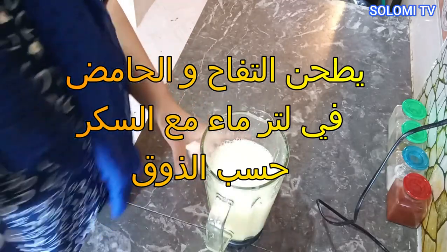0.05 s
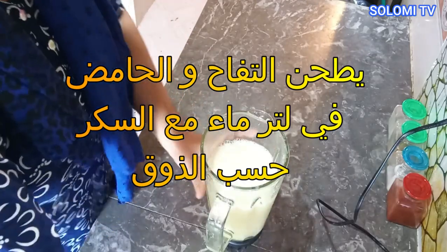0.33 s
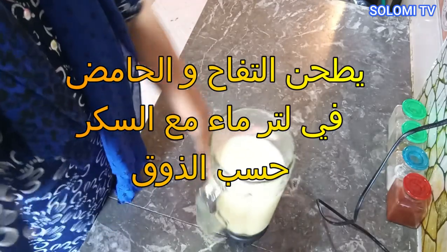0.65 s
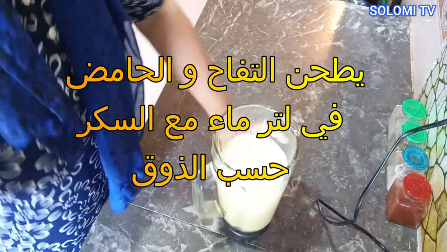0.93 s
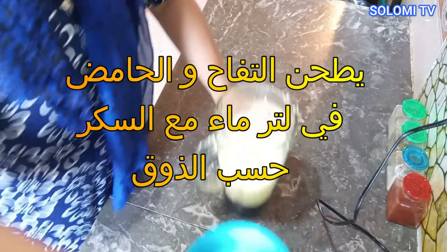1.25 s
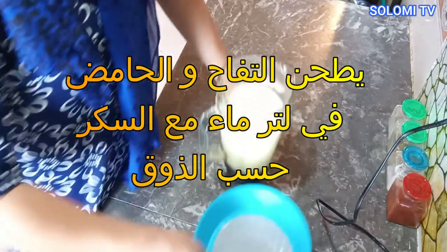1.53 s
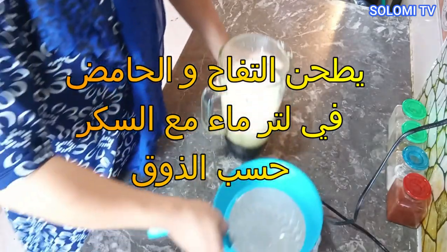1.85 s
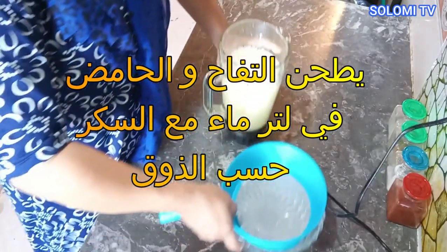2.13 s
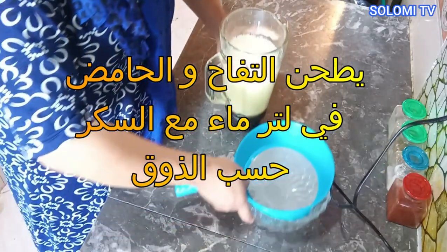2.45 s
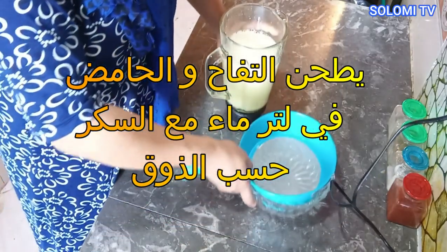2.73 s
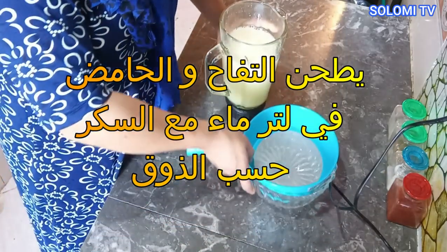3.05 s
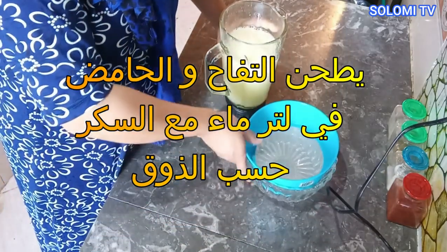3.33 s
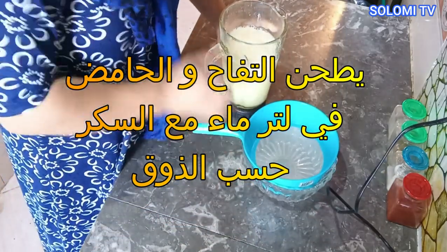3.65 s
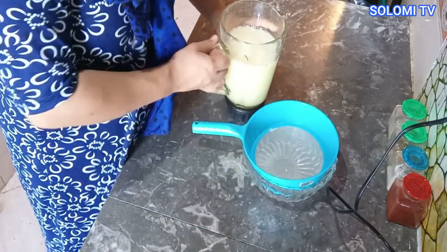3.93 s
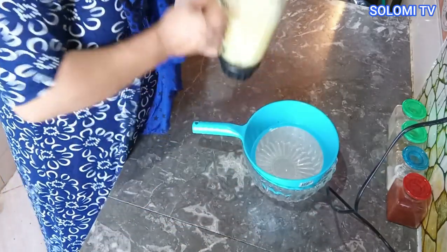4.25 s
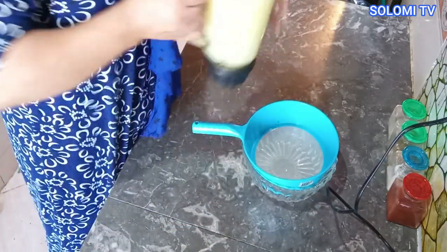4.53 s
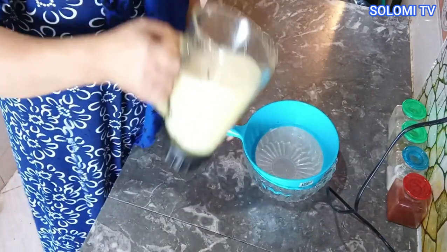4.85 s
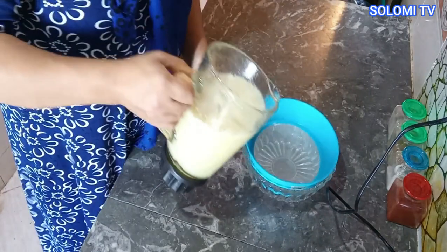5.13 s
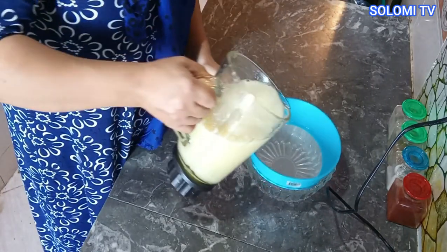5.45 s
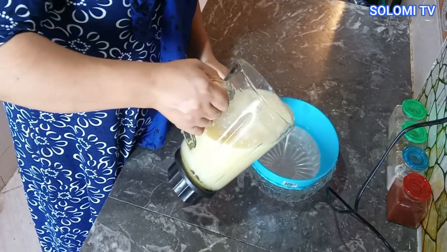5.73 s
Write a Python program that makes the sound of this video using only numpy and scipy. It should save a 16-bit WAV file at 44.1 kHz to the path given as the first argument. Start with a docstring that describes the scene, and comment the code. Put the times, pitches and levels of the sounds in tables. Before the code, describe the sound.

Close kitchen handling: cloth rustles, a glass bowl clatters and slides on stone, and a jug knocks just before juice trickles out.

```python
"""Kitchen handling, close by, over a low hum, a hiss and soft scuffs of feet. A glass bowl with a plastic
strainer in it is dragged off its place (0.5 s) and carried past a rustling dress (1.2 s). It lands
rattling on a stone counter (1.8 s) and is pushed along: its foot sticks and slips, so the stone scrapes,
the glass sings and the strainer clacks (2.8 s). A glass jug knocks on the strainer's rim (5.3 s) and the
first juice slips in with a patter of froth and a few chirping bubbles (5.7 s)."""
import sys
import numpy as np
from scipy import signal
from scipy.fft import rfft, irfft, next_fast_len
from scipy.io import wavfile

SR = 44100
rng = np.random.default_rng(int(sys.argv[2]) if len(sys.argv) > 2 else 0)


def log_audio(samples):
    """Write samples as a 16-bit WAV file to the path given in sys.argv[1]."""
    # one column per channel
    frames = np.atleast_2d(samples).T
    # limit to full scale, then quantise
    limited = np.clip(frames, -1, 1)
    pcm = np.round(limited * 32767).astype(np.int16)
    wavfile.write(sys.argv[1], SR, pcm)


N = 259749
TIME = np.arange(N) / SR

# The kitchen's reverb. Each row: frequency in Hz, t60 (time to fall 60 dB) in seconds.
ROOM_DECAY = [(100, 0.73), (400, 0.48), (900, 0.48), (2500, 0.3), (6000, 0.21), (15000, 0.22)]
# How much more the left microphone hears than the right. Each row: frequency in Hz, lead in dB.
MIC_BALANCE = [(60, 4), (150, 2.5), (320, 1), (460, 6), (720, 0.5), (1100, 8.5), (1400, 8.5), (2400, 7.5),
               (4300, 4), (6400, 6), (7600, 7), (9500, -3.5), (11000, -12), (15000, 2)]
# Room tone. Each row: frequency in Hz, relative level in dB.
AIR_EQ = [(20, -14), (50, -16.5), (110, -4.5), (180, -8), (450, -4.5), (750, -20.5), (1500, -19),
          (3400, -21), (7500, -11), (9300, -28.5), (11000, -18.5), (13500, -27.5), (15000, -24)]
# Peaks in the hiss. Each row: centre in Hz, width in Hz, added level in dB relative to the EQ.
HISS_PEAKS = [(2563, 355, 17.5), (3737, 92, 11), (4577, 484, 13.5), (5350, 290, 2.7), (6430, 510, 9.5),
              (6670, 30, 9.9), (8530, 210, 1), (14670, 2300, 11)]
# Tones of the hum. Each row: frequency in Hz, level in dB before dips and sinking.
HUM_TONES = [(64.6, -58), (49.7, -64), (100, -65.5), (139.3, -67)]
HUM_DIP_TIMES_S = [3.58, 4.5, 5.24, 5.65]

# Feet scuffing as the body turns. Each row: middle in seconds, relative level in dB.
FOOTSTEPS = [(0.15, -54.5), (0.3, -53.5), (0.62, -52.5), (0.82, -57), (3.74, -65), (3.92, -61.5),
             (4.07, -63), (4.32, -60.5), (4.965, -52), (5.1, -58.5), (5.7, -61), (5.81, -59)]
# The dull tone of a scuff. Each row: frequency in Hz, relative level in dB.
SCUFF_EQ = [(60, -29), (150, -14), (235, 7.5), (290, -1), (440, 8.5), (580, -6.5), (780, -8), (1000, -24.5),
            (4000, -23.5)]
# Bumps of hands, feet and things. Each row: start in seconds, level in dB, pitch in Hz, t60 in seconds.
BODY_BUMPS = [(0.496, -22, 287, 0.045), (0.481, -19, 720, .04), (0.499, -18.5, 930, 0.05),
              (1.072, -22.5, 148, 0.067), (1.835, -16, 240, .07), (2.225, -21, 150, .1),
              (2.275, -23, 235, .06), (2.36, -23, 245, .07), (2.442, -17.5, 159, 0.06),
              (2.84, -25, 125, .07), (3.03, -24, 270, .06), (3.92, -32, 140, .15), (4.54, -30, 140, .15),
              (4.93, -29.5, 611, 0.08), (4.968, -24.5, 233, 0.045)]
# Partials of a bump. Each row: multiple of the pitch, relative level in dB.
BUMP_PARTIALS = [(.72, -13.5), (1, -1), (1.34, -8), (1.83, -13.5)]
# Light ticks. Each row: start in seconds, level in dB.
LIGHT_TICKS = [(0.261, -21.5), (0.277, -28)]
# The bright tone of a tick. Each row: frequency in Hz, relative level in dB.
TICK_EQ = [(100, -26), (700, -22), (1500, 4), (2600, 9), (4000, 5.5), (7000, -7), (10000, -5.5),
           (16000, -7)]

# Arm swings that rustle the dress. Each row: peak in seconds, relative level in dB, build-up in seconds,
# fade in dB per second.
ARM_SWEEPS = [(0.03, -53, 0.083, 38), (0.605, -51, 0.07, 45), (1.195, -35.2, 0.16, 16),
              (1.35, -41, .015, 150), (1.9, -40.5, 0.092, 26)]
# The tone of the cloth. Each row: frequency in Hz, relative level in dB.
CLOTH_EQ = [(40, -27.5), (150, 3), (215, -15), (320, 0), (450, -11), (900, -22), (1400, -16), (1870, -8),
            (2200, -12.5), (2850, -8), (3250, -7.5), (4400, 0), (5400, -0.5), (6000, 0.5), (7500, -4.5),
            (8500, -14), (11000, -15), (13500, -24.5), (15500, -12)]
# Peaks in the rustle. Each row: centre in Hz, width in Hz, added level in dB relative to the EQ.
CLOTH_PEAKS = [(720, 90, 0), (1100, 70, 0), (1850, 90, -3), (2890, 70, -4), (4150, 130, -10),
               (4550, 100, -4), (4940, 110, -3), (5900, 170, -4), (6480, 80, -4), (7480, 60, -4)]

# The tone of the froth. Each row: frequency in Hz, relative level in dB.
FROTH_EQ = [(300, -12), (1150, -29), (2100, -4), (2600, 5), (3600, -11), (7000, -10.5), (16000, -15)]
# Bubbles in the first juice. Each row: start in seconds, level in dB, starting pitch in Hz.
JUICE_BUBBLES = [(5.732, -33, 1600), (5.783, -34, 1460), (5.797, -29, 1500), (5.812, -31, 2500),
                 (5.833, -29.5, 1540), (5.846, -29, 2560), (5.862, -34, 3000), (5.869, -32, 1470)]
# Juice sliding up the jug, then onto the mesh. Each: start and stop in seconds, relative level in dB.
SLOSH, POUR = (5.19, 5.23, -54.5), (5.725, 5.89, -56)

# Taps on the strainer as the hand lets go and the jug tilts. Each row: start in seconds, level in dB.
PLASTIC_TAPS = [(3.373, -19), (5.629, -15.5), (5.672, -20)]
# The tapped plastic's ring. Each row: frequency in Hz, relative level in dB, t60 in seconds.
PLASTIC_MODES = [(375, 0, .14), (455, -6, .07), (640, -11, .07), (800, -9, .06), (2180, -11, .33),
                 (2310, -1, .035), (3700, -14, .07)]
# The jug meets the rim. Each row: start in seconds, level in dB, ring in dB relative to the hit.
JUG_HITS = [(5.329, -12.5, -3), (5.333, -7.5, 1.5)]
# The thock of jug on rim. Each row: frequency in Hz, relative level in dB.
JUG_HIT_EQ = [(40, -30), (140, 4), (205, -7), (300, 0), (480, -2), (700, 3.5), (1000, -9), (1500, -12),
              (2400, -7), (3300, -19.5), (5500, -21.5), (9000, -41), (16000, -53)]
# The ring of jug on rim. Each row: frequency in Hz, relative level in dB, t60 in seconds.
JUG_HIT_MODES = [(650, 7, 0.11), (778, -4.5, 0.54), (947, -1.5, 0.27), (1120, -9, .35), (1308, -14, 0.23),
                 (2168, -6.5, 0.42), (3690, -6, 0.17), (5580, -9.5, 0.2)]
# The strainer hits the bowl. Each row: start in seconds, level in dB, glass ring in dB relative to the hit.
CLACK_HITS = [(2.7587, 1, 1), (2.803, -13, -16)]
# The attack of a clack. Each row: frequency in Hz, relative level in dB.
CLACK_EQ = [(40, -34), (110, -12), (400, -10), (660, 6), (800, 7), (950, 11.5), (1150, 2), (1400, 4),
            (2550, 5), (3400, -14), (6000, -48), (16000, -66)]
# The strainer's ring in a clack. Each row: frequency in Hz, relative level in dB, t60 in seconds.
CLACK_MODES = [(759, 0, .55), (880, 3, .12), (985, -1, .25), (1141, -4, .35), (1319, -6, .4),
               (1815, 1, .12)]

# The glass bowl's ring. Each row: frequency in Hz, relative level in dB, t60 in seconds.
GLASS_MODES = [(1398, -6, .45), (2165, -10, .35), (2945, -1, .13), (4555, 4, .13), (4592, -3, .1),
               (6632, 3, .1), (6720, -5, .07), (7644, -4, .06), (8310, -14, .06), (9880, -13, .06),
               (10740, -15, .04), (15084, -24, .1)]
# The hollow of bowl and strainer. Each row: frequency in Hz, relative level in dB, t60 in seconds.
HOLLOW_MODES = [(680, -2, .06), (755, -6, .09), (850, -5, .06), (958, 0.5, .08), (1070, -4, .06),
                (1280, -7, .07), (1365, -2, .06), (1430, -3, .05), (1820, -6, .05)]
# The bowl's foot hits the counter. Each row: start in seconds, level in dB, ring in dB relative to the hit.
BOWL_HITS = [(0.482, -19, -14), (1.7597, 5.5, -5.5), (1.772, -6, -3), (1.787, -1.5, -16),
             (1.8075, 3.5, -8.5), (1.833, -1, -18), (1.84, -3, -12), (1.854, -3, -15), (1.861, -2, -18),
             (1.868, -3, -16), (1.894, -8, -12), (1.9975, -5.5, -14), (2.006, -10, -18),
             (3.372, -14.5, -12)]
# The thock of glass on stone. Each row: frequency in Hz, relative level in dB.
BOWL_HIT_EQ = [(40, -36), (130, -14), (400, -12), (540, -13), (700, -1.5), (950, -4), (1120, -9.5),
               (1400, 3), (1680, -8), (2300, -16), (3500, -35), (8000, -57), (16000, -62)]
# The bowl's two slides. Each: start, stop and build-up in seconds, relative scrape and singing in dB.
PICK_UP, PUSH = (0.425, 0.53, 0.06, -46.5, -46), (1.96, 3.25, 0.12, -42.5, -49)
# The scrape as the bowl is picked up. Each row: frequency in Hz, relative level in dB.
DRAG_EQ = [(60, -8.5), (200, -24), (320, 6), (560, 6), (730, 11), (850, 5), (1000, 8.5), (1300, -11),
           (1700, -17), (3400, -26), (6000, -21), (16000, -41)]
# The scrape as it is pushed. Each row: frequency in Hz, relative level in dB.
PUSH_EQ = [(40, -16), (140, -6), (195, -7), (280, 0), (420, -1.5), (670, 4.5), (800, -1), (960, 0),
           (1500, -6), (2300, -11), (2950, -11), (3600, -18), (5500, -16), (9000, -31), (16000, -25)]
# How hard the bowl bears on the counter. Each row: time in seconds, relative pressure in dB.
PRESSURE_CURVE = [(2.05, 2), (2.13, -1), (2.2, -11), (2.25, 1), (2.35, -2), (2.46, 4), (2.54, -1),
                  (2.63, 1), (2.69, -4), (2.85, 0), (2.95, -3), (3.02, 1), (3.14, -2), (3.27, 2.5)]
# The groan of its foot on the stone. Each row: time in seconds, pitch in Hz.
GROAN_CURVE = [(2.05, 730), (2.24, 675), (2.5, 690), (2.58, 935), (2.67, 930), (2.72, 680), (2.95, 760),
               (3.02, 860), (3.18, 720), (3.3, 695)]
# The foot jerks free during the push. Each row: start in seconds, relative level in dB.
PUSH_JOLTS = [(2.233, -14), (2.355, -15), (2.444, -9.5), (2.564, -15), (2.722, -6), (2.74, -4.5),
              (2.98, -15), (3.023, -14), (3.098, -18), (3.23, -14.5)]
# The tone of a jolt. Each row: frequency in Hz, relative level in dB.
JOLT_EQ = [(100, -8), (500, 2), (680, 6), (1400, -8), (4000, -30)]
# The foot catches and the glass squeals. Each row: middle in seconds, length in seconds,
# frequency in Hz (the nearest glass mode sounds), relative level in dB.
GLASS_SQUEALS = [(0.515, .07, 6632, -46), (0.538, .06, 7644, -46), (2.08, .05, 7644, -45),
                 (2.145, .11, 7644, -45), (2.24, .05, 7644, -46), (2.266, 0.08, 4555, -42),
                 (2.315, .05, 6632, -41), (2.41, .05, 6632, -43), (2.41, 0.12, 7644, -48),
                 (2.84, .05, 4555, -45), (3.005, 0.1, 6632, -35.5), (3.015, 0.09, 7644, -48),
                 (3.024, 0.06, 4600, -38.5), (3.2, .05, 6632, -41), (3.238, 0.04, 6632, -41)]


def amp(db):
    """Decibels to gain."""
    return 10 ** (np.asarray(db) / 20)


def unit(x):
    """Scales to rms 1."""
    return x / np.sqrt(np.mean(x ** 2) + 1e-20)


def unit_energy(x):
    """Scales to energy 1."""
    return x / np.linalg.norm(x)


def read(points, hz):
    """Reads a table on a log-frequency axis."""
    f, value = np.transpose(points)
    return np.interp(np.log(hz + 1), np.log(f + 1), value)


def automation(points):
    """Draws straight lines through rows of time and value."""
    return np.interp(TIME, *np.transpose(points))


def add(mix, s, sound):
    """Adds a sound at s seconds."""
    part = mix[round(s * SR):][:len(sound)]
    part += sound[:len(part)]


def through(x, response):
    """Convolves and keeps the scene's length."""
    return signal.oaconvolve(x, response)[:N]


def colour(x, gain_at):
    """Filters by a gain given as a function of frequency."""
    size = next_fast_len(x.shape[-1] + 4096)
    gain = gain_at(np.fft.rfftfreq(size, 1 / SR))
    return irfft(rfft(x, size) * gain, size)[..., :x.shape[-1]]


def equalise(x, eq, peaks):
    """Applies a smooth EQ with bell-shaped peaks standing out of it."""
    def gain_at(f):
        bells = sum(amp(db) * np.exp(-2 * ((f - hz) / width) ** 2) for hz, width, db in peaks)
        return amp(read(eq, f)) * (1 + bells)
    return colour(x, gain_at)


def resonate(x, hz, width_hz):
    """A resonance of gain 1 that follows the curve hz."""
    turn = np.exp(2j * np.pi * np.cumsum(hz) / SR)
    pole = np.exp(-np.pi * width_hz / SR)
    return 2 * (turn * signal.lfilter([1 - pole], [1, -pole], x / turn + 1e-18)).real


def drift(rate_hz):
    """Slow random wander of rms 1."""
    return unit(colour(rng.standard_normal(N), lambda f: np.exp(-(f / rate_hz) ** 2)))


def grains(per_s, spread_db):
    """A random train of clicks, a few of them louder than the rest."""
    size = amp(spread_db * np.minimum(rng.exponential(1, N), 4)) * rng.choice([-1, 1], N)
    return unit(size * (rng.random(N) < per_s / SR))


def blows(rows):
    """One impulse for each row of time and level."""
    out = np.zeros(N)
    for s, db in rows:
        add(out, s, amp([db]))
    return out


def stroke(start, stop, attack_s, release_s):
    """A movement's envelope: it builds up, holds until it stops, and dies away."""
    return np.clip((TIME - start) / attack_s, 0, 1) * np.exp(-np.maximum(TIME - stop, 0) / release_s)


def click(eq, size=4096):
    """The tightest (minimum-phase) pulse with this EQ, of energy 1."""
    log_gain = np.log(amp(read(eq, abs(np.fft.fftfreq(size, 1 / SR)))))
    spectrum = np.exp(np.conj(signal.hilbert(log_gain)))
    return unit_energy(np.fft.ifft(spectrum).real[:size // 2])


def ring(modes, onset_s=.0005):
    """Dying sines with a slightly rounded attack, of energy 1."""
    t = TIME[:SR // 2]
    sound = sum(amp(db - 60 * t / t60) * np.sin(2 * np.pi * hz * t) for hz, db, t60 in modes)
    return unit_energy(sound * (1 - np.exp(-t / onset_s)))


def hollowed(eq, modes, hollow_db):
    """A click together with a hollow body's answer to it, of energy 1."""
    pulse = click(eq)
    answer = amp(hollow_db) * unit_energy(signal.fftconvolve(pulse, ring(modes)))
    add(answer, 0, pulse)
    return unit_energy(answer)


def diffuse(pair, apart_hz=1100):
    """Sound from all sides: alike at both microphones in the bass, unrelated in the treble."""
    def likeness(f):
        return .98 * np.exp(-(f / apart_hz) ** 2)
    mid = colour(pair[0], lambda f: np.sqrt((1 + likeness(f)) / 2))
    side = colour(pair[1], lambda f: np.sqrt((1 - likeness(f)) / 2))
    return np.array([mid + side, mid - side])


def kitchen(x, wet_db, pan_db=0., early_db=5, early_s=0.0045, predelay_s=0.0014):
    """Direct sound (positive pan is left), quick reflections off counter and tiles, and a short tail."""
    noise = diffuse(rng.standard_normal((2, SR * 3 // 4)))
    hz, t, bands = signal.stft(noise, SR, nperseg=256)
    decay = amp(-60 * t / read(ROOM_DECAY, hz)[:, None])
    tail = signal.istft(bands * decay, SR, nperseg=256)[1]
    t = TIME[:tail.shape[1]]
    tail *= (t > predelay_s) * (1 + amp(early_db) * np.exp(-t / early_s))
    wet = np.array([through(x, unit_energy(side)) for side in tail])
    return x * amp([[pan_db / 2], [-pan_db / 2]]) + amp(wet_db) * wet


def knocks(hits, thock, modes, wet_db, pan_db, early_db, ring_wet_db):
    """Each hit is a short thock and a longer ring, with separate reverb sends."""
    thocks, rings, tone = np.zeros(N), np.zeros(N), ring(modes)
    for s, db, ring_db in hits:
        add(thocks, s, amp(db) * thock)
        add(rings, s, amp(db + ring_db) * tone)
    return kitchen(thocks, wet_db, pan_db, early_db) + kitchen(rings, ring_wet_db)


def room_hiss(level_db=-51, flicker_db=1.1):
    """A wide bed of hiss whose level flickers slightly."""
    air = equalise(diffuse(rng.standard_normal((2, N))), AIR_EQ, HISS_PEAKS)
    return unit(air) * amp(level_db + flicker_db * drift(25))


def low_hum(waver=0.4, dip_s=.07, dip_db=-16, sink_at_s=4.35, sink_db_per_s=4):
    """Low tones that waver, dip now and then and finally sink in level."""
    hum = np.zeros(N)
    for hz, db in HUM_TONES:
        wavering = 1 + waver * (drift(5) + 1j * drift(4.3))
        hum += amp(db) * unit((wavering * np.exp(2j * np.pi * hz * TIME)).real)
    dips = sum(np.exp(-((TIME - s) / dip_s) ** 2) for s in HUM_DIP_TIMES_S)
    return hum * amp(dip_db * dips - sink_db_per_s * np.maximum(TIME - sink_at_s, 0))


def shuffling_feet(gain_db=-7, step_s=0.046, stir_db=-69, uneven_db=4):
    """Soft scuffs over a faint, uneven stirring; they arrive mostly by way of the room."""
    steps = sum(amp(db) * np.exp(-((TIME - s) / step_s) ** 2) for s, db in FOOTSTEPS)
    scuffs = grains(per_s=390, spread_db=0.5) * np.hypot(steps, amp(stir_db + uneven_db * drift(12)))
    return amp(gain_db) * kitchen(through(scuffs, click(SCUFF_EQ)), wet_db=8)


def bumps_and_ticks(attack_s=0.0068):
    """Handling noise: damped bumps with a soft attack, and light ticks."""
    out = np.zeros(N)
    for s, db, hz, t60 in BODY_BUMPS:
        bump = ring([(hz * multiple, partial_db, t60) for multiple, partial_db in BUMP_PARTIALS])
        bump *= 1 - np.exp(-TIME[:len(bump)] / attack_s)
        add(out, s, amp(db) * unit_energy(bump))
    for s, db in LIGHT_TICKS:
        add(out, s, amp(db) * click(TICK_EQ))
    return kitchen(out, wet_db=6)


def dress_rustle(gain_db=2.3, flutter_db=0.88, folds_db=2.5):
    """Countless threads slip as the arm swings; the cloth is wide, so each side hears its own folds too."""
    sweeps = []
    for s, db, rise_s, fade_db_per_s in ARM_SWEEPS:
        rise = np.exp(-(np.minimum(TIME - s, 0) / rise_s) ** 2)
        sweeps.append(rise * amp(db - fade_db_per_s * np.maximum(TIME - s, 0)))
    level = np.linalg.norm(sweeps, axis=0) * amp(flutter_db * drift(30))
    threads = [grains(per_s=12000, spread_db=2) for _ in range(3)]
    centre, *folds = [unit(equalise(layer, CLOTH_EQ, CLOTH_PEAKS)) * level for layer in threads]
    return amp(gain_db) * (centre + amp(folds_db) * diffuse(folds))


def juice(patter_db=-2, bubble_attack_s=.002, bubble_t60_s=.05, rise_per_s=1.6):
    """Thick froth patters, and small bubbles chirp upward as they near the surface."""
    flow = sum(amp(db) * stroke(start, stop, attack_s=0.019, release_s=0.06)
               for start, stop, db in (SLOSH, POUR))
    sound = amp(patter_db) * through(grains(per_s=790, spread_db=3.0) * flow, click(FROTH_EQ))
    t = TIME[:SR // 8]
    envelope = (1 - np.exp(-t / bubble_attack_s)) * amp(-60 * t / bubble_t60_s)
    for s, db, hz in JUICE_BUBBLES:
        chirp = np.sin(2 * np.pi * hz * t * (1 + rise_per_s * t / 2))
        add(sound, s, amp(db) * unit_energy(chirp * envelope))
    return kitchen(sound, wet_db=-1)


def strainer_taps():
    """Light touches set the plastic ringing briefly."""
    return kitchen(through(blows(PLASTIC_TAPS), ring(PLASTIC_MODES)), wet_db=1)


def jug_knock():
    """The glass jug strikes the strainer's rim in a tight, ringing double hit."""
    return knocks(JUG_HITS, click(JUG_HIT_EQ), JUG_HIT_MODES,
                  wet_db=7, pan_db=-3, early_db=5, ring_wet_db=0)


def strainer_clack():
    """The strainer knocks against the bowl, and both plastic and glass ring."""
    thock = hollowed(CLACK_EQ, CLACK_MODES, hollow_db=-6)
    return knocks(CLACK_HITS, thock, GLASS_MODES, wet_db=5, pan_db=-2, early_db=9, ring_wet_db=-2)


def slide_level(start, stop, build_s, db, db_per_s):
    """A slide's envelope, which ramps steadily as the bowl slows."""
    ramp = amp(db + db_per_s * np.clip(TIME - start, 0, stop - start))
    return ramp * stroke(start, stop, build_s, release_s=0.032)


def stick_slip(slide, judder_db=2.8, uneven_db=0.6, db_per_s=-3):
    """The bowl's foot sticks and slips in tiny, uneven steps that weaken as it slows."""
    start, stop, build_s, scrape_db, _ = slide
    steps = grains(per_s=650, spread_db=3.5) * unit(amp(judder_db * drift(30) + uneven_db * drift(4.7)))
    return steps * slide_level(start, stop, build_s, scrape_db, db_per_s)


def glass_singing(gain_db=0.7, swell_db=2.2, tilt_db_per_octave=2.6, low_cut_hz=3400, t60_share=.95):
    """Friction feeds the glass's high modes and damps the ring a little; it grows as the bowl slows."""
    voice, lowest_hz = np.zeros(N), GLASS_MODES[0][0]
    for hz, db, t60 in GLASS_MODES:
        rubbed = through(rng.standard_normal(N), ring([(hz, 0, t60 * t60_share)]))
        feed = amp(db + tilt_db_per_octave * np.log2(hz / lowest_hz)) / (1 + (low_cut_hz / hz) ** 8)
        voice += feed * unit(rubbed * amp(swell_db * drift(90)))
    friction = sum(slide_level(start, stop, build_s, sing_db, db_per_s=2)
                   for start, stop, build_s, _, sing_db in (PICK_UP, PUSH))
    gain = amp(gain_db + .3 * automation(PRESSURE_CURVE))  # .3 dB of singing per dB of pressure
    return kitchen(gain * unit(voice) * friction, wet_db=3.5, early_db=0)


def glass_squeals(gain_db=0.5, wander_hz=12, chatter_db=2):
    """The foot catches and one mode of the glass locks into a short, rough squeal."""
    out, mode_hz = np.zeros(N), np.array(GLASS_MODES)[:, 0]
    wander_turns = np.cumsum(wander_hz * drift(120)) / SR
    chatter = unit(amp(chatter_db * drift(200)))
    for s, length, near_hz, db in GLASS_SQUEALS:
        hz = mode_hz[np.argmin(abs(mode_hz - near_hz))]
        swell = np.cos(np.pi * np.clip((TIME - s) / length, -.5, .5)) ** 2
        out += amp(db + gain_db) * swell * chatter * np.sin(2 * np.pi * (hz * TIME + wander_turns))
    return kitchen(out, wet_db=-3.5, pan_db=7)


def bowl_scrape(drag_db=-3, push_db=-2.5, jolt_db=-7, groan_db=14, groan_width_hz=70):
    """Slips shake bowl and counter: a short drag, then a long push with jolts and a gliding groan."""
    drag = amp(drag_db) * through(stick_slip(PICK_UP), click(DRAG_EQ))
    shake = stick_slip(PUSH) * amp(automation(PRESSURE_CURVE))
    scrape = amp(push_db) * through(shake, hollowed(PUSH_EQ, HOLLOW_MODES, hollow_db=-9))
    jolts = blows(PUSH_JOLTS)
    thuds = amp(jolt_db) * through(jolts, click(JOLT_EQ))
    groan_hz = automation(GROAN_CURVE)
    groan = resonate(shake + jolts, groan_hz, groan_width_hz)
    groan = amp(groan_db) * resonate(groan, groan_hz, 2 * groan_width_hz)  # steepens the skirts
    return kitchen(drag + scrape + thuds + groan, wet_db=3.5, early_db=2)


def bowl_knocks():
    """The bowl's foot knocks and rattles on stone; the hollow answers and the glass rings."""
    thock = hollowed(BOWL_HIT_EQ, HOLLOW_MODES, hollow_db=-6)
    return knocks(BOWL_HITS, thock, GLASS_MODES, wet_db=1.5, pan_db=0, early_db=5.5, ring_wet_db=-2)


def scene():
    """The stereo mix: hits, friction, body movement and juice over the room tone."""
    hits = bowl_knocks() + strainer_clack() + jug_knock() + strainer_taps()
    friction = bowl_scrape() + glass_singing() + glass_squeals()
    movement = bumps_and_ticks() + shuffling_feet() + dress_rustle()
    return hits + friction + movement + juice() + room_hiss() + low_hum()


def record(dry):
    """Two microphones of unlike colour, the left a millisecond late; then a high cut."""
    left_lag_samples, high_cut_hz = 43, 16000
    left, right = colour(dry, lambda f: amp(np.outer([.5, -.5], read(MIC_BALANCE, f))))
    heard = np.array([np.pad(left, (left_lag_samples, 0))[:N], right])
    high_cut = signal.firwin(511, high_cut_hz, window=("kaiser", 9), fs=SR)
    return signal.oaconvolve(heard, high_cut[None], "same")


dry = scene()
out = record(dry)
log_audio(out)
```